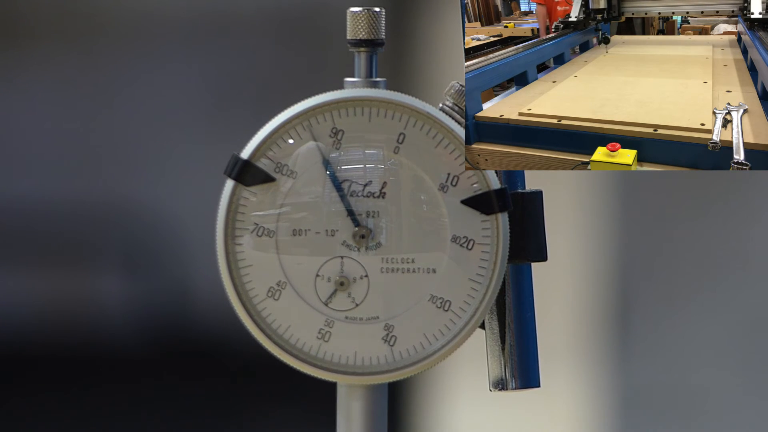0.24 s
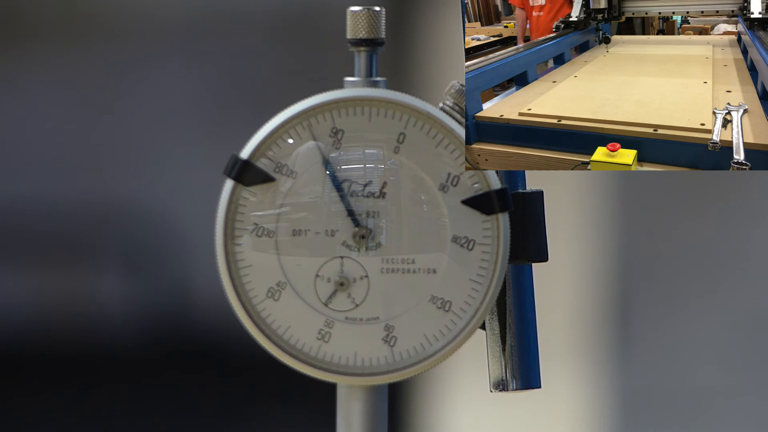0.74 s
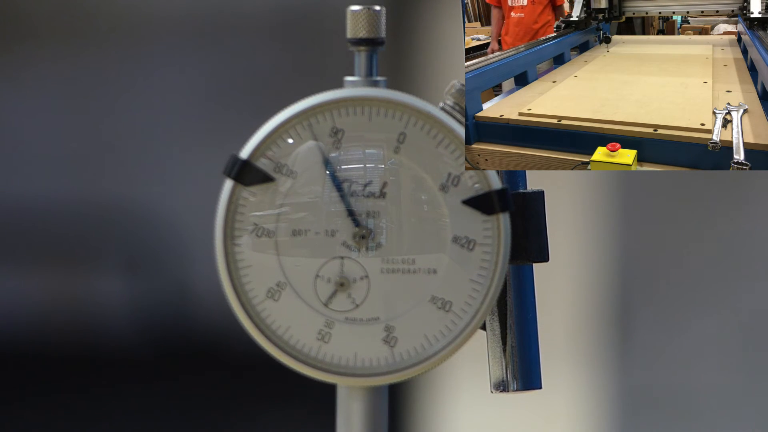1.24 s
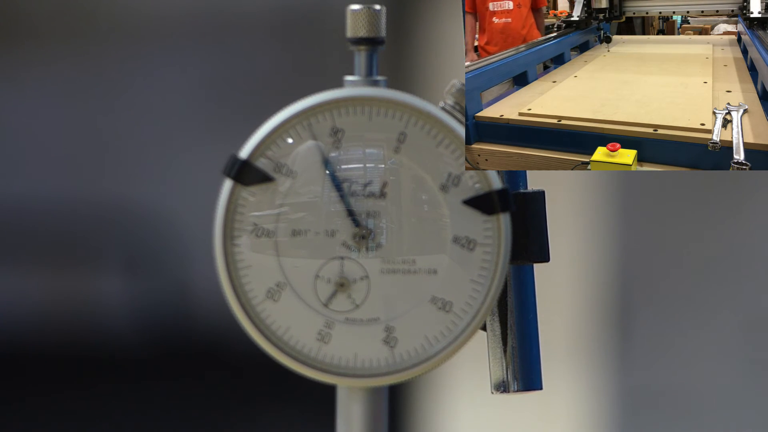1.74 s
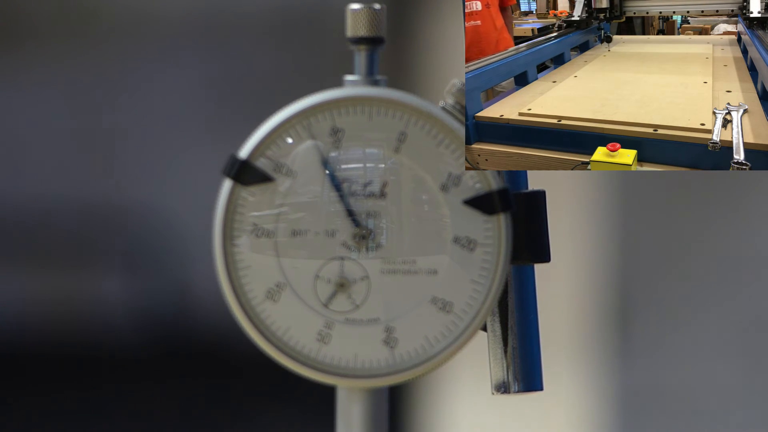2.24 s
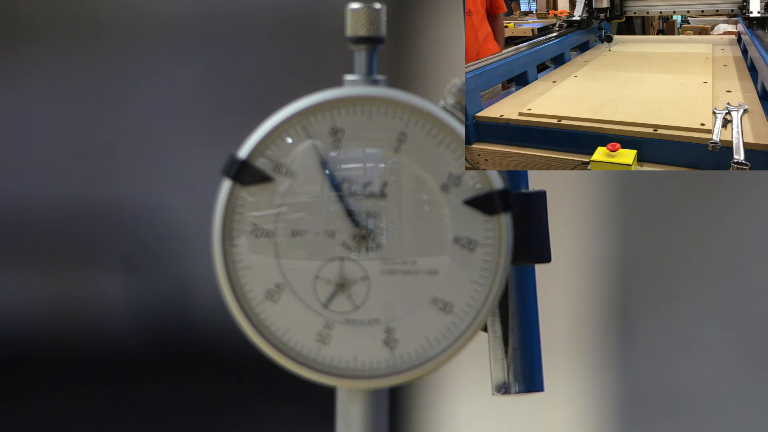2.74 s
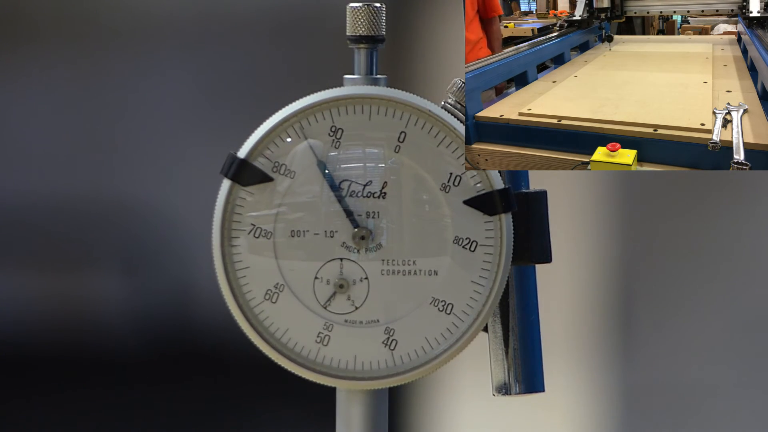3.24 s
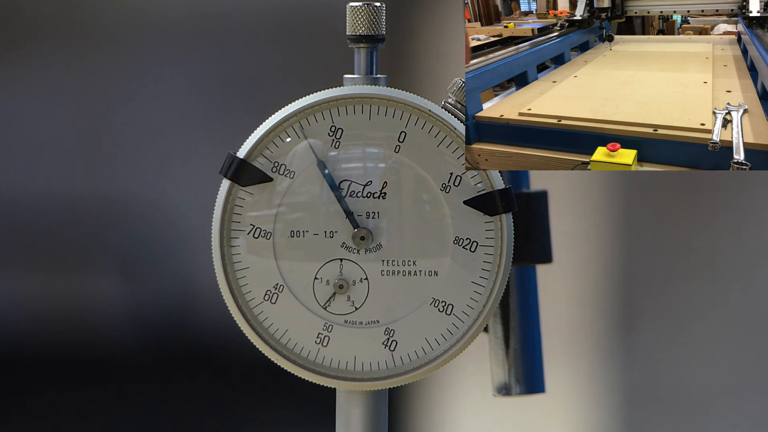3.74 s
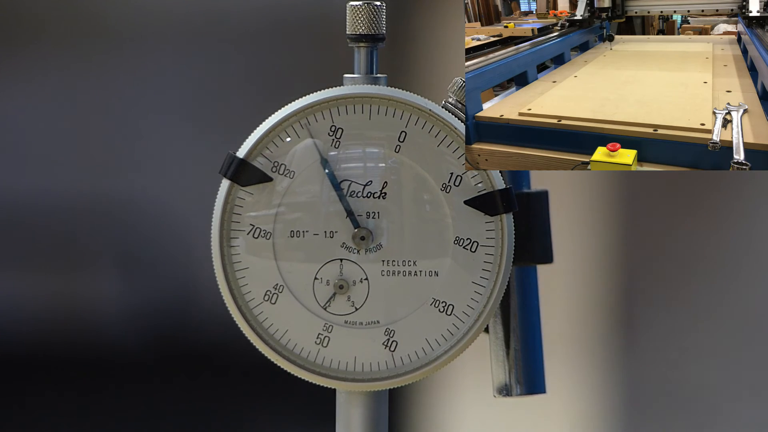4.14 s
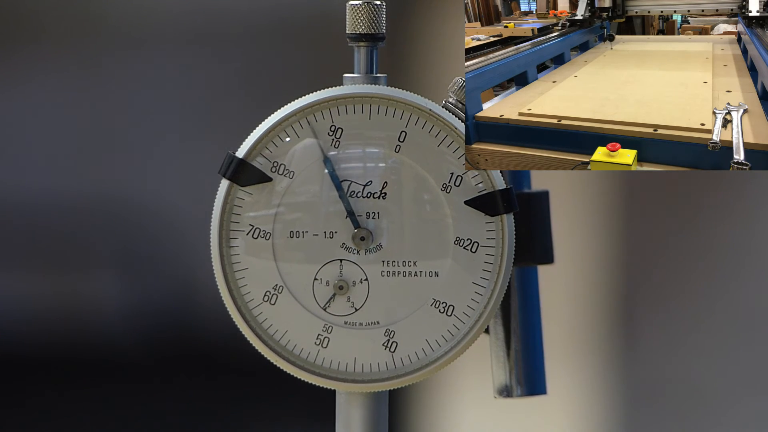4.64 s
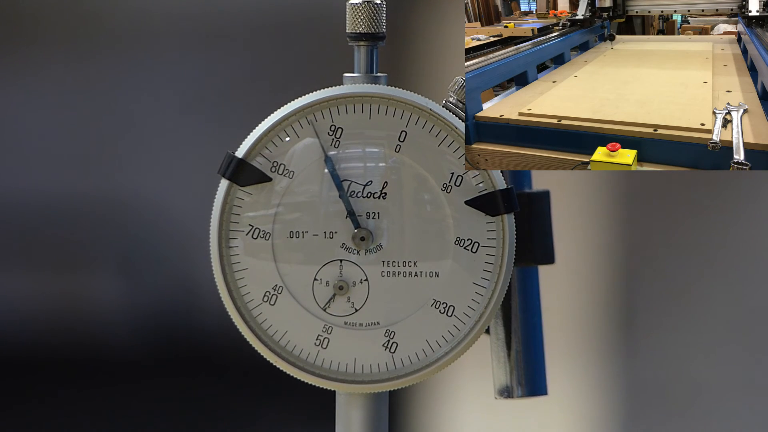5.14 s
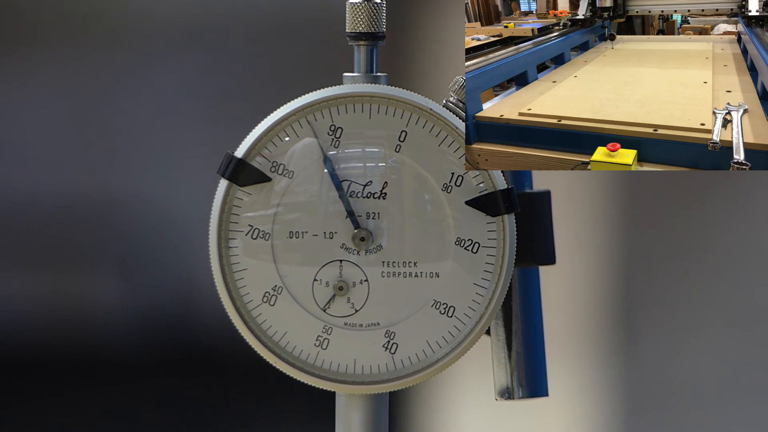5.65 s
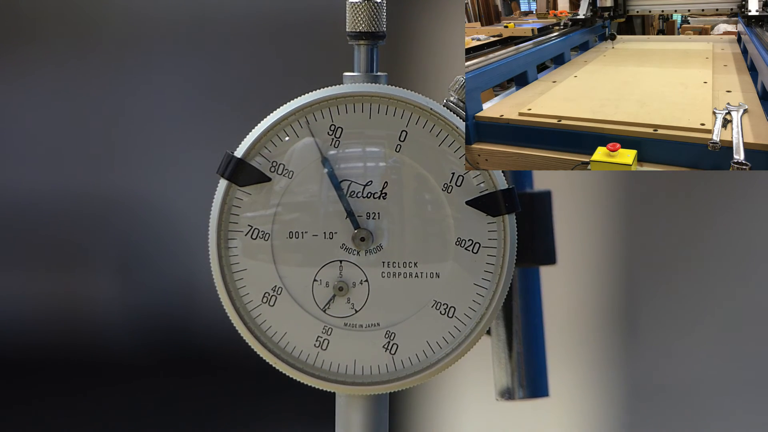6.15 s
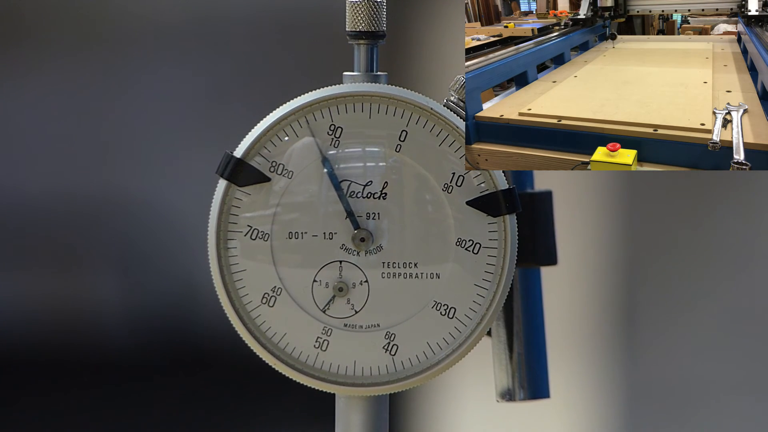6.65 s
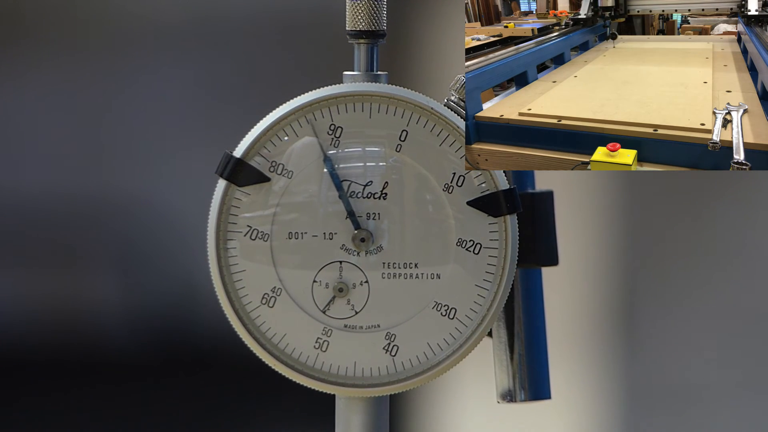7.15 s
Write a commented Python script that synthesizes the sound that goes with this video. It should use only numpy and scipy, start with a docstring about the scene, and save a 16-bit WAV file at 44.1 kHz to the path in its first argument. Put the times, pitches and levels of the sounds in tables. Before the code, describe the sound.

Stepper motors of a workshop gantry drone at one steady low pitch over rumbling bearings and soft hiss, with a faint tick and a few light scuffs.

```python
"""A steady step tone and its orders hum: stepper motors drive the gantry of a router table in a workshop.
Sines make the motor, gear and belt tones; shaped noise makes the bearing rumble and the fan-like hiss.
A faint tick (a blow ringing short modes) and scuffs (puffs of noise) fall in; a fuzzy whistle comes and goes.
A thin electronic whine, a few high sines, is strongest in the right channel."""
import sys
import numpy as np
from scipy import signal
from scipy.fft import rfft, irfft
from scipy.io import wavfile

SR = 44100
rng = np.random.default_rng(int(sys.argv[2]) if len(sys.argv) > 2 else 0)


def bounce(signal):
    """Save signal as a 16-bit WAV file at the path given by the first command-line argument."""
    frames = np.transpose(np.atleast_2d(signal))
    limited = np.clip(frames, -1, 1)
    pcm = np.round(limited * 32767).astype(np.int16)
    wavfile.write(sys.argv[1], SR, pcm)


N = 325899  # length in samples

STEP_HZ = 170.24  # step rate of the motors


def amp(db):
    """Gain of a dB value."""
    return 10 ** (np.asarray(db, float) / 20)


def on_hz(points, hz):
    """Reads a spectrum by straight lines over log frequency."""
    point_hz, value = np.transpose(points)
    return np.interp(np.log(hz + 1), np.log(point_hz + 1), value)


def on_time(rows):
    """Reads a curve at every sample."""
    return np.interp(np.arange(N) / SR, *np.transpose(rows))


def drift(rate_hz):
    """Random wander of standard deviation 1: noise whose spectrum falls steeply above rate_hz."""
    hz = np.fft.rfftfreq(N, 1 / SR)
    lowpass = 1 / (1 + (hz / rate_hz) ** 4)
    wander = irfft(rfft(rng.standard_normal(N)) * lowpass, N)
    return wander / wander.std()


def coloured(gain):
    """Noise whose power per Hz is the square of gain."""
    return irfft(rfft(rng.standard_normal(N)) * gain, N) * np.sqrt(SR / 2)


def tones(tone_hz, level_db, waver_db=0., rate_hz=1.):
    """Sum of sines at random phases, given by rms level, whose strengths wander independently."""
    t = np.arange(N) / SR
    total = np.zeros(N)
    for f, db in zip(tone_hz, level_db):
        strength = np.sqrt(2) * amp(db + waver_db * drift(rate_hz))
        total += strength * np.sin(2 * np.pi * (f * t + rng.random()))
    return total


def steps():
    """The step tone and its octave share one phase, which wavers at random about a steady pitch."""
    # slow uneven strength of the hum, before its quick waver: start_s, level_db (rms)
    hum_curve = [(0.0, -19.5), (0.25, -17), (0.7, -19.5), (1.3, -17), (1.8, -17.5), (2.45, -20.5),
                 (2.76, -15.5), (3.1, -19.5), (3.4, -20.5), (3.55, -18.5), (3.75, -23), (4.05, -15.5),
                 (4.5, -19), (5.2, -17.5), (5.7, -20.5), (6.15, -19.5), (6.45, -22.5), (6.85, -17.5),
                 (7.05, -22.5), (7.39, -20)]
    t = np.arange(N) / SR
    phase = 2 * np.pi * STEP_HZ * t + 0.26 * drift(9.9)  # radians
    strength = np.sqrt(2) * amp(on_time(hum_curve)) * (1 + 0.2 * drift(10.2))
    # the octave, in dB relative to the step tone, grows as the gantry travels
    octave_start_db, octave_db_per_s = -23.5, 0.78
    octave = amp(octave_start_db + octave_db_per_s * t + 1.03 * drift(2.3))
    return strength * (np.sin(phase) + octave * np.cos(2 * phase))


def drive_train():
    """Motor orders at fractions of the step rate, with gear and belt tones unrelated to it, all sines."""
    # motor orders: sixteenths of the step rate; mean level_db of each
    order_sixteenths = (8, 12, 17, 24, 25, 28, 40, 48, 68, 80)
    order_db = [-53, -41, -42.5, -65, -58.5, -49, -68, -51.5, -65, -68.5]
    # steady gear and belt tones: pitch_hz; mean level_db of each
    gear_hz = (136.16, 306.4, 330.41, 335.18, 347.56, 360.0, 492.29, 516.04, 525.44, 623.0, 638.53, 670.6,
               720.57, 748.92, 758.49, 831.09, 944.01, 984.57, 1081.5, 1186.3, 1274.5, 1499.2, 2013.3,
               2023.8, 2253.6, 2297.3, 2426.5, 3060.4)
    gear_db = [-43, -52, -45.5, -48, -45, -52, -51, -56, -57, -52, -58, -53, -60, -60, -54, -57, -64, -63.5,
               -70, -70, -66, -72, -72, -71, -72, -72, -73, -72]
    # tones that swell or fade once as the gantry travels:
    # pitch_hz, before_db, after_db, middle_s, span_s, later_drift_db_per_s
    swell_rows = [(428.3, -52.5, -36.5, 4.45, 0.99, -2.8), (682, -47, -58, 5.2, .4, 0),
                  (964.04, -64, -55.5, 2.8, 1.5, 0)]
    orders = tones(np.array(order_sixteenths) * (STEP_HZ / 16), order_db, waver_db=3.0, rate_hz=1.0)
    gears = tones(gear_hz, gear_db, waver_db=2.0, rate_hz=2.4)
    t = np.arange(N) / SR
    swell_db = []
    for _, before_db, after_db, middle_s, span_s, drift_db_per_s in swell_rows:
        change = .5 + .5 * np.tanh(2 * (t - middle_s) / span_s)  # 0 to 1
        later_db = drift_db_per_s * np.maximum(t - middle_s - span_s, 0)
        swell_db.append(before_db + (after_db - before_db) * change + later_db)
    swells = tones([row[0] for row in swell_rows], swell_db, waver_db=0.95, rate_hz=6.0)
    return orders + gears + swells


def rumble(hz):
    """Bearing noise and hiss with frame resonances; the upper mids flutter and buzz faintly at the step rate."""
    # broad rumble and hiss: pitch_hz, level_db (per Hz)
    broad = [(20, -73), (60, -72), (90, -62), (220, -55.5), (390, -66.5), (560, -74), (900, -77),
             (1800, -80.5), (3300, -80.5), (4000, -83), (4600, -88), (6500, -93.5), (14800, -97),
             (15500, -104)]
    # resonances of the frame: pitch_hz, width_hz (6 dB down), peak_db (per Hz)
    frame = [(50, 8, -67), (95, 16, -59.5), (128, 5.3, -60), (160.2, 15.6, -42.5), (187, 10.7, -44),
             (262, 16, -77), (310, 9.2, -65.5), (334.8, 22, -50.5), (423.5, 66, -64.5), (500, 71, -64.5),
             (599, 38, -66), (660, 160, -67), (748, 59, -70), (878, 25, -70), (988, 34, -70.5),
             (1290, 210, -79.5), (3125, 300, -79.5), (3610, 390, -80), (3860, 170, -80.5)]
    power = amp(on_hz(broad, hz)) ** 2
    for f, width_hz, peak_db in frame:
        power += amp(peak_db) ** 2 / (1 + (2 * (hz - f) / width_hz) ** 2) ** 2
    # share of the power, roughly 900 to 4300 Hz, that flutters
    upper_mids = 1 / (1 + (900 / (hz + 1)) ** 4) / (1 + (hz / 4300) ** 8)
    buzz = 0.089 * np.sin(2 * np.pi * STEP_HZ * np.arange(N) / SR)
    flutter = amp(0.7 * drift(30.)) * (1 + buzz)
    swelling = amp(0.63 * drift(16.0))  # the rest swells more slowly
    rest = swelling * coloured(np.sqrt(power * (1 - upper_mids)))
    return rest + flutter * coloured(np.sqrt(power * upper_mids))


def scuffs(hz):
    """Rubbing: each scuff is a puff of coloured noise that swells fast and dies away."""
    # start_s, level_db (crest, below 4400 Hz), rise_s, t60_s, treble_db (extra above 4400 Hz)
    scuff_rows = [(1.06, -55, .015, .2, 14), (3.06, -55, .015, .15, 14), (4.325, -40, .012, .12, -4),
                  (4.37, -50, .02, .25, 5), (5.398, -37.5, 0.015, 0.23, -2), (7.141, -32, .007, 0.17, -3),
                  (7.177, -52, .005, .22, -1), (7.235, -47, .012, 0.11, -7)]
    # colour before the extra treble: pitch_hz, relative_db
    colour_points = [(600, -17), (1050, -5), (1500, 2), (2100, 1.5), (2800, -7), (3700, -3), (4600, -13),
                     (9000, -19), (13000, -30)]
    t = np.arange(N) / SR
    body, fizz = np.zeros(N), np.zeros(N)  # envelopes of the low and the treble part
    for start_s, level_db, rise_s, t60_s, treble_db in scuff_rows:
        age = np.maximum(t - start_s, 0)
        rise = np.sin(np.pi / 2 * np.minimum(age / rise_s, 1))
        puff = amp(level_db - 60 * np.maximum(age - rise_s, 0) / t60_s) * rise
        body += puff
        fizz += puff * amp(treble_db)
    colour, low = amp(on_hz(colour_points, hz)), hz < 4400
    dull = coloured(colour * low)
    bright = coloured(colour * ~low)
    ragged = amp(1.1 * drift(90.))  # the contact slips unevenly
    return ragged * (body * dull + fizz * bright) / dull.std()


def tick():
    """A small part knocks once: a firm blow with a chattering tail rings short modes that speak softly."""
    # the knock: start_s, level_db (rms of the first 20 ms), blow_s (decay constant)
    knock_row = (1.548, -38, .0001)
    # its modes: pitch_hz, relative_db, t60_s
    modes = [(2300, -4, .022), (2440, 0, .035), (2568, 0, .035), (2700, -5, .025), (3700, -5, .02)]
    start_s, level_db, blow_s = knock_row
    t = np.arange(SR // 4) / SR
    chatter = .07 * np.exp(-t / .075) * rng.standard_normal(len(t))
    force = np.exp(-t / blow_s) + chatter
    ring = sum(amp(db - 60 * t / t60_s) * np.sin(2 * np.pi * f * t) for f, db, t60_s in modes)
    soft_onset = 1 - np.exp(-t / .002)
    knock = signal.fftconvolve(force, ring * soft_onset)[:len(t)]
    early_rms = np.sqrt(np.mean(knock[:SR // 50] ** 2))
    padded = np.pad(amp(level_db) * knock / early_rms, (0, N - len(t)))
    return np.roll(padded, round(start_s * SR))


def whistle(hz):
    """A fuzzy whistle in the hiss: a narrow band of noise that comes and goes."""
    # pitch_hz, width_hz (6 dB down), mean level_db
    band = (3638, 28, -61.5)
    f, width_hz, level_db = band
    noise = coloured(1 / (1 + (2 * (hz - f) / width_hz) ** 2))
    return amp(level_db + 2.3 * drift(2.5)) * noise / noise.std()


def whine():
    """Electronic whine: two close sines throb together over a lower octave, each side flickering slightly."""
    # pitch_hz: the tone, its close second, its lower octave
    whine_hz = (15734.27, 15747.26, 7867.13)
    # level_db of each tone (rms, before the flicker and the band limit): a left row, a right row
    whine_db = [
        [-61.6, -67.2, -83],
        [-49.4, -55, -63.7],
    ]
    t = np.arange(N) / SR
    flicker = amp([1.1 * drift(50.), .8 * drift(50.)])
    sines = np.sin(2 * np.pi * np.outer(whine_hz, t))
    return np.sqrt(2) * amp(whine_db) @ sines * flicker


def channel_difference(mid, hz):
    """Half the left-right difference: noise of its own, less a share of the common sound (a lean right)."""
    # noise that differs between the two channels, which are alike in the mids: pitch_hz, level_db (per Hz)
    apart = [(20, -84), (90, -90), (170, -83), (260, -107), (380, -126), (900, -121), (4000, -126),
             (4800, -109), (6500, -105), (14800, -107), (15500, -106)]
    # share of the common sound that leans to the right: pitch_hz, share (no unit)
    lean = [(40, 0.042), (100, 0.022), (200, 0.027), (300, 0.00095), (5000, 0), (8500, 0.085), (14000, .12),
            (15500, .3)]
    own_noise = coloured(amp(on_hz(apart, hz)))
    return own_noise - irfft(rfft(mid) * on_hz(lean, hz), N)


def scene():
    """Nearly mono machine, with a small difference between the channels, and the whine."""
    hz = np.fft.rfftfreq(N, 1 / SR)
    mid = steps() + drive_train() + rumble(hz) + whistle(hz) + scuffs(hz) + tick()
    side = channel_difference(mid, hz)
    return np.array([mid + side, mid - side]) + whine()


def record(dry):
    """Steep low-pass that ends the band just above the whine."""
    edge_hz = 15765
    lowpass = signal.firwin(8191, edge_hz, window=("kaiser", 9), fs=SR)
    return signal.oaconvolve(dry, lowpass[None], "same")


dry = scene()
out = record(dry)
bounce(out)
```